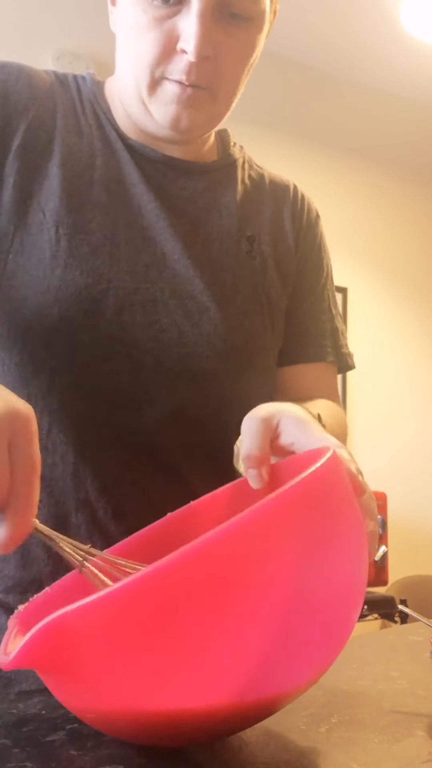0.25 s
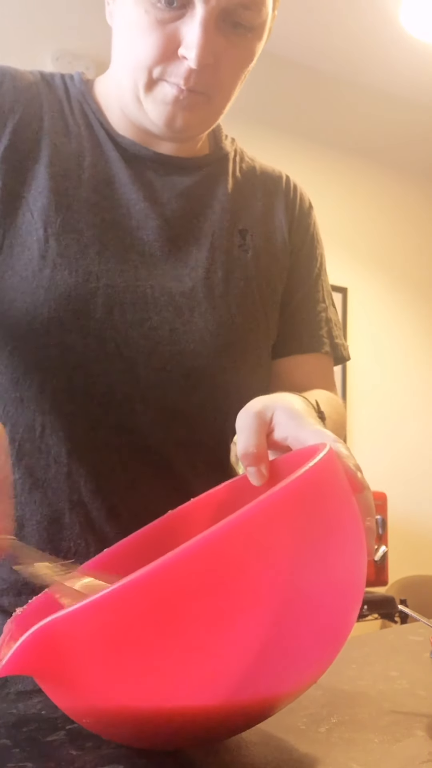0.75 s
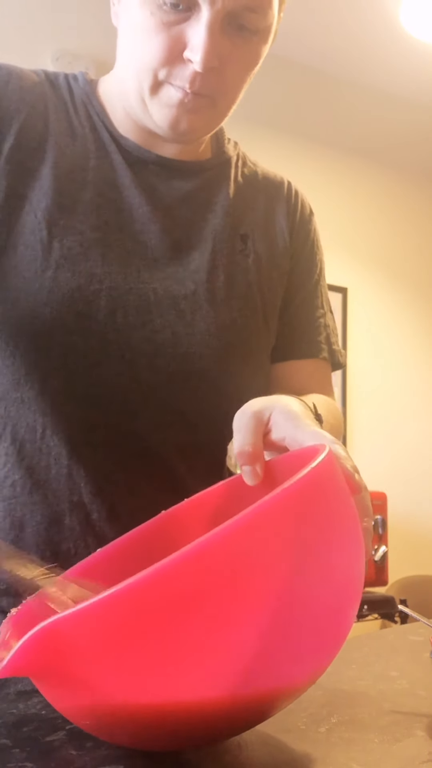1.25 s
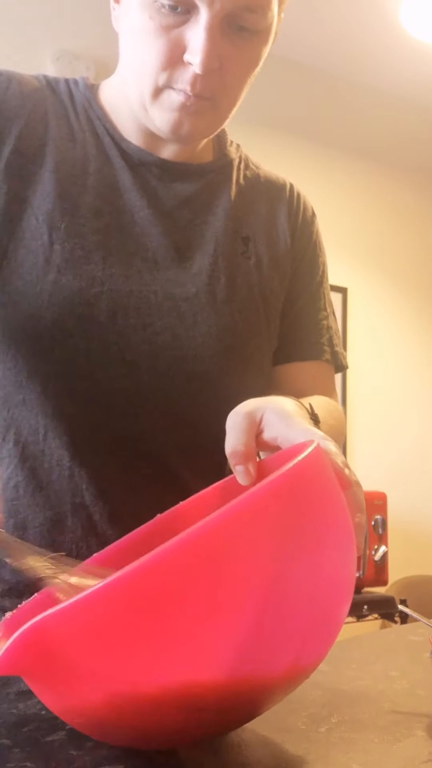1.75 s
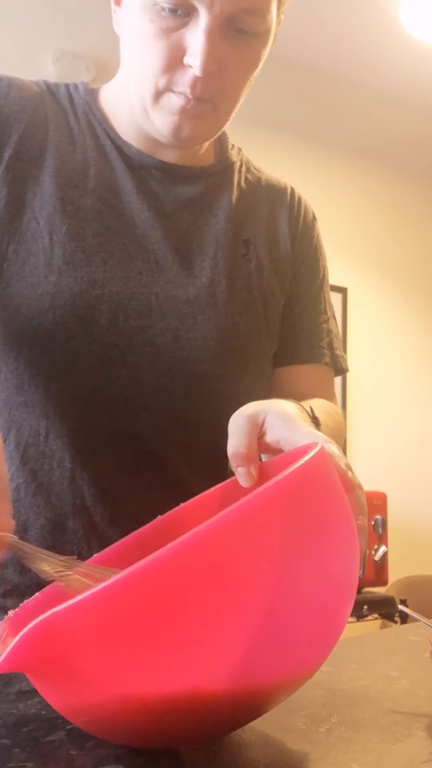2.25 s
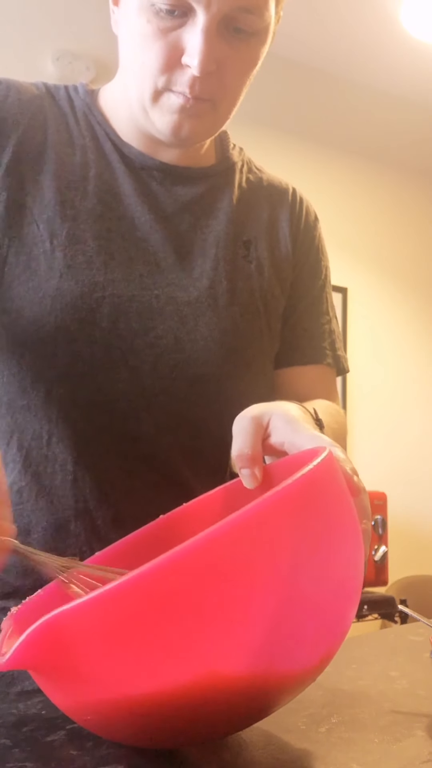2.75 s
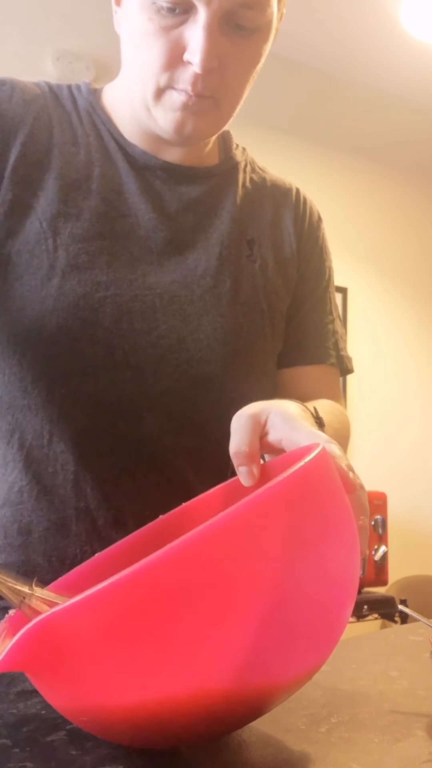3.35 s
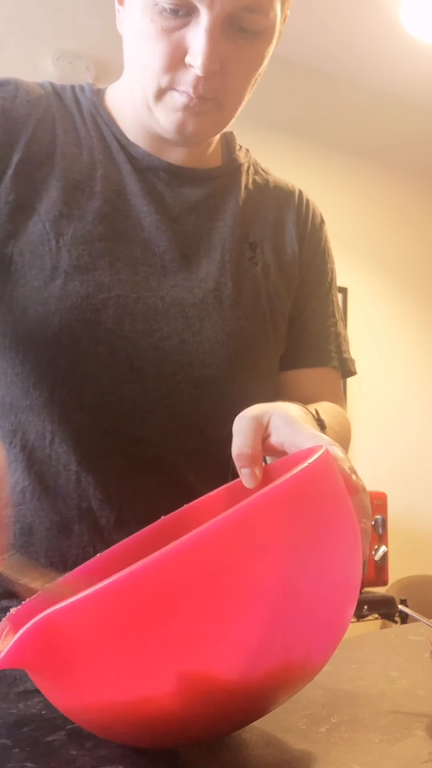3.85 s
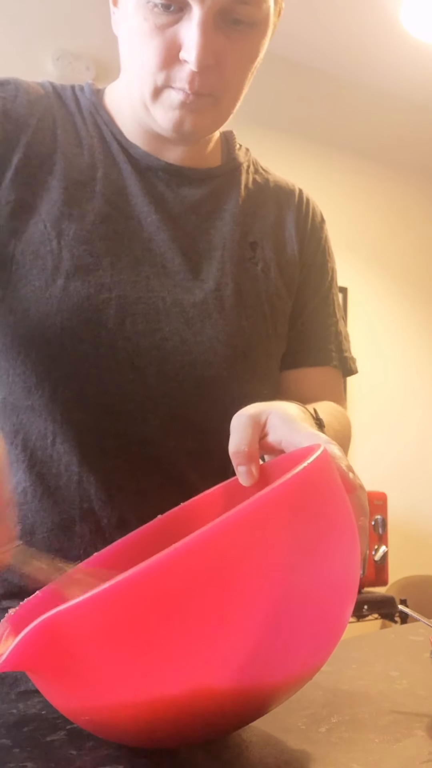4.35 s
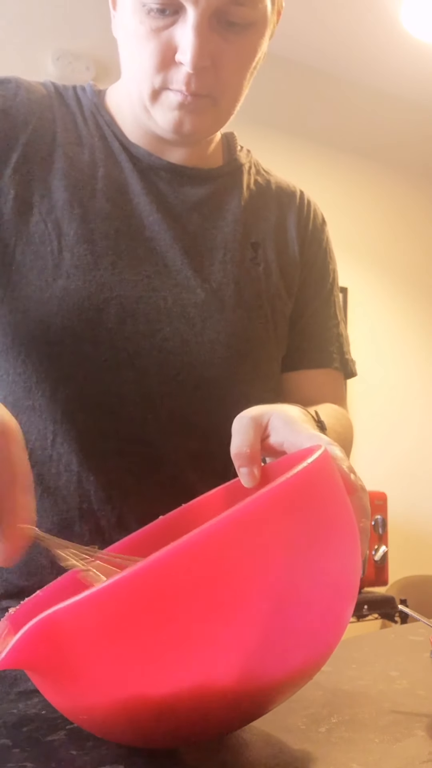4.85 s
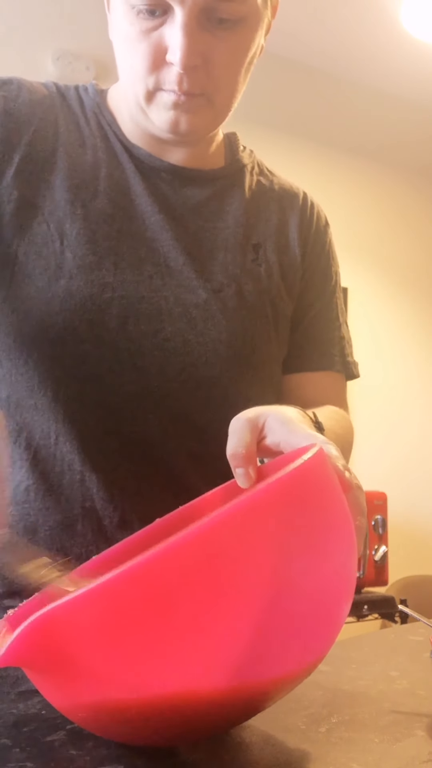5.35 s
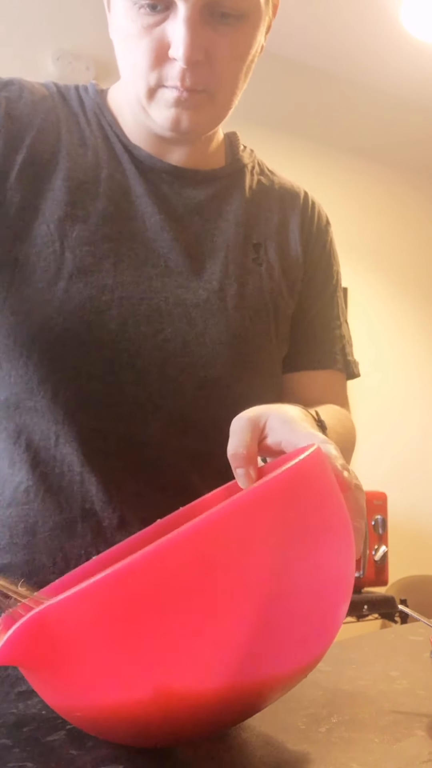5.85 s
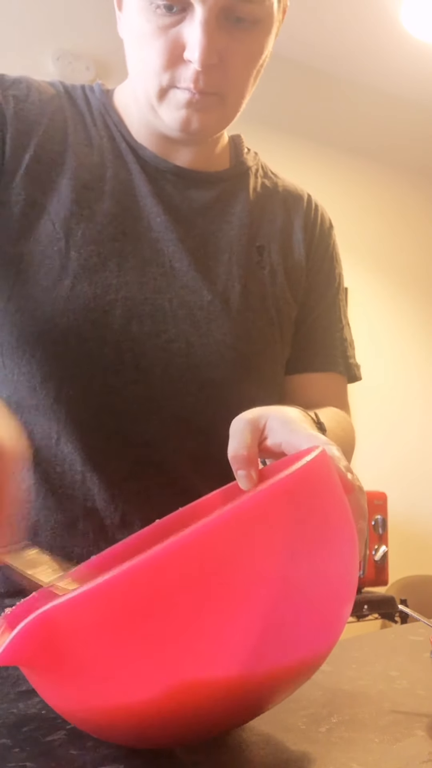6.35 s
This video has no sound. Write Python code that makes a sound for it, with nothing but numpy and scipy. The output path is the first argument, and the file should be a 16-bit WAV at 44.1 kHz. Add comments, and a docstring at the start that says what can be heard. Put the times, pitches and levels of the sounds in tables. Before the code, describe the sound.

Rapid whisking in a plastic bowl: raspy wire scrapes, wet slaps, plasticky clacks and low batter thumps, heard very close with short kitchen echoes.

```python
"""A wire whisk beats batter in a plastic bowl, about six strokes a second, close to a phone.
In each stroke the wires slap into the batter, drag through it, scrape up the wall and lift off: shaped random clicks.
Knocks on the wall are short noise bursts through ringing plastic; lumps of batter flop with a low thump.
The deeper the whisk runs, the longer it drags and the more the batter wobbles and fizzes between strokes.
The bowl booms low and rings near 2 kHz; quick echoes, a small room and a faint background surround it."""
import sys
import numpy as np
from scipy import signal
from scipy.fft import rfft, irfft
from scipy.io import wavfile
from scipy.ndimage import uniform_filter1d

SR = 44100
rng = np.random.default_rng(int(sys.argv[2]) if len(sys.argv) > 2 else 0)


def output_pcm(signal):
    """Save a mono or channel-first signal as 16-bit PCM at the path in sys.argv[1].

    Samples are clipped to [-1, 1] before scaling.
    """
    pcm = np.clip(np.atleast_2d(signal).T, -1, 1) * 32767
    wavfile.write(sys.argv[1], SR, np.round(pcm).astype(np.int16))


N = 290619
T = np.arange(N) / SR  # time in seconds

# All levels in dB are relative: later mixing gains also apply.
# turns of the whisk: (lands_s, fastest_scrape_s, scrape_db, push_on_bowl_db)
STROKES = [(0.042, 0.063, -33, -7.5), (0.28, 0.297, -23, -10), (0.46, 0.48, -19, -4.5),
           (0.634, 0.666, -21, -5), (0.749, .851, -19.5, -11.5), (0.919, 1.02, -17, -4.5),
           (1.092, 1.185, -16.5, -0.5), (1.274, 1.352, -19, -1), (1.413, 1.522, -13.5, -2.5),
           (1.588, 1.682, -18, -1.5), (1.786, 1.844, -18, -5.5), (1.937, 2.005, -19, -2),
           (2.106, 2.168, -24, -7), (2.289, 2.343, -17, 3.5), (2.432, 2.509, -17.5, 1),
           (2.618, 2.663, -21, 5.5), (2.808, 2.832, -21, 8.5), (2.944, 3.03, -23.5, -13),
           (3.11, 3.191, -21, -5), (3.273, 3.355, -26.5, -1), (3.449, 3.53, -23, -2),
           (3.62, 3.698, -22.5, -1.5), (3.806, 3.881, -16.5, -4), (3.963, 4.04, -21, -5),
           (4.149, 4.215, -17, -0.5), (4.287, 4.393, -15, -6.5), (4.488, 4.569, -18, -20),
           (4.649, 4.74, -21.5, -3), (4.819, 4.905, -25, -1.5), (5.012, 5.095, -19.5, -3.5),
           (5.173, 5.283, -28, -3), (5.347, 5.459, -19, -1), (5.526, 5.644, -20, -9.5),
           (5.702, 5.826, -18, 2.5), (5.895, 6.005, -16, 0), (6.08, 6.191, -22, -3.5),
           (6.262, 6.37, -17.5, -2), (6.433, 6.56, -22.5, 1)]
# big lumps of batter flopping against the bowl: (start_s, level_db, pitch_hz)
FLOPS = [(0.134, -8, 120), (0.187, -17, 140), (0.239, -17.5, 114), (0.362, -11.5, 128), (0.543, -16, 156),
         (1.412, -13, 160), (4.477, -16, 154), (4.748, -12.5, 170), (4.819, -15.5, 148), (5.56, -19, 150),
         (5.898, -20.5, 130), (6.449, -20, 152)]
# ringing of the hollow above the batter: (pitch_hz, width_hz, level_db)
HOLLOW_MODES = [(471, 55, -5.5), (527, 39, -4), (628, 37.5, 1.5), (706.4, 47, -2.5), (765, 43, -6.5),
                (915, 63, -16.5)]
# ringing of the plastic wall: (pitch_hz, width_hz, level_db)
WALL_MODES = [(1214, 42, -6), (1286, 43, -5.5), (1588, 28, -7), (1774, 53, -3), (1923, 91, 1.5),
              (2109, 120, -1.5), (2303, 154, -1.5), (2506, 108, 2.5), (2833, 166, -2)]
# tone of wires sliding fast on the wall: (frequency_hz, level_db)
SCRAPE_TONE = [(500, -33.5), (1500, -11), (2500, -3.5), (3300, -10.5), (4200, -4.5), (5300, 1.5), (5750, 3),
               (6250, -9.5), (7500, 5.5), (8400, -4), (10200, -6), (12500, -31.5), (15500, -45)]

WETTER_DB_PER_S = 0.6  # the batter smacks louder as it is beaten wetter


def undb(db):
    """Turn decibels into a gain."""
    return 10 ** (np.asarray(db) / 20)


def unit(x):
    """Scale to an rms (average strength) of one."""
    return x / np.sqrt(np.mean(x ** 2))


def peaked(x):
    """Scale so that the loudest 4 ms have an rms of one."""
    loudest_power = uniform_filter1d(x ** 2, SR // 250).max()
    return x / np.sqrt(loudest_power)


def add(track, s, sound):
    """Mix a short sound into a track at time s."""
    i = max(int(s * SR), 0)
    track[i:i + len(sound)] += sound[:max(N - i, 0)]


def through(x, response):
    """Pass a sound through an impulse response."""
    return signal.fftconvolve(x, response)[:len(x)]


def excite(force, response):
    """Drive a resonator or tone filter whose response is scaled to unit energy."""
    return through(force, response / np.linalg.norm(response))


def gains(points, size):
    """Read a (frequency_hz, level_db) curve at every frequency of a transform."""
    hz, db = np.transpose(points)
    bins_hz = np.fft.rfftfreq(size, 1 / SR)
    return undb(np.interp(np.log(bins_hz + 1), np.log(hz), db))


def colour(points, size=1024):
    """Make an impulse response with the given tone that never sounds ahead of its cause."""
    # folding the cepstrum forward in time gives the minimum-phase response
    cepstrum = irfft(np.log(gains(points, size)))
    cepstrum[1:size // 2] *= 2
    cepstrum[size // 2 + 1:] = 0
    return irfft(np.exp(rfft(cepstrum)))


def ring(modes, size=8192):
    """Add up dying sine tones; wider modes die faster and neighbours swing in opposite directions."""
    t = T[:size]
    total = np.zeros(size)
    for k, (hz, width, db) in enumerate(modes):
        dying = np.exp(-np.pi * width * t)
        total += (-1) ** k * undb(db) * width * dying * np.sin(2 * np.pi * hz * t)
    return total


def drift(per_s, count=1000):
    """Join random values by straight lines, per_s of them each second."""
    return np.interp(T * per_s, np.arange(count), rng.standard_normal(count))


def slips(per_s, spread_db):
    """Stick-slip makes random tiny clicks of uneven size, rms one."""
    happens = rng.random(N) < per_s / SR
    direction = np.sign(rng.standard_normal(N))
    size = undb(spread_db * rng.standard_normal(N))
    return unit(happens * direction * size)


def burst(swell_s, size=8192):
    """A rough contact is noise that swells and dies within milliseconds."""
    t = T[:size]
    return rng.standard_normal(size) * t / swell_s * np.exp(-t / swell_s)


def thump(hz, swell_s, size=6000):
    """A soft push is a low sine whose strength swells to one and dies away."""
    t = T[:size]
    strength = (t / swell_s) ** 2 * np.exp(2 - 2 * t / swell_s)
    return strength * np.sin(2 * np.pi * hz * t)


def background():
    """Both microphones share a low room rumble; higher up each has its own faint hiss."""
    # tone of the background: (frequency_hz, level_db)
    hum_tone = [(20, -11), (45, -3), (65, -27), (200, -11), (400, -27), (2000, -21.5), (8000, -18),
                (15500, -36)]
    shared = rfft(rng.standard_normal(N))
    own = rfft(rng.standard_normal((2, N)))
    apart = np.clip(np.fft.rfftfreq(N, 1 / SR) / 600, 0, 1)  # fully separate from 600 Hz up
    mixed = shared * np.sqrt(1 - apart ** 2) + own * apart
    return unit(irfft(mixed * gains(hum_tone, N), N))


def knocks(chatter_s, tick_s):
    """The loops land almost together: a burst rings the wall, with a steel tick and a push on the whole bowl."""
    # wires striking the wall: (start_s, clack_db, tick_relative_db, boom_relative_db)
    knock_times = [(0.025, -23, 11, -3), (0.2681, -21, 7, 0), (0.3491, -16, 7, -7), (0.4557, -25, 2, 5),
                   (0.636, -15.5, -1, -7), (0.8059, -13.5, -3, -4), (0.9243, -14.5, -3, -11.5),
                   (1.0945, -16, 4, -4), (1.475, -13, 10, -9), (1.6412, -11, 0, -4), (1.7973, -19, 16, 1.5),
                   (2.128, -9.5, -3, -10), (2.2949, -8, 2, -8.5), (2.622, -7.5, 5, -13),
                   (2.7869, -11.5, 11.5, -1.5), (2.9674, -9.5, 3.5, -8.5), (3.4743, -10.5, 0, -10),
                   (3.8235, -8.5, 4, -14), (4.1594, -10.5, 4, -8.5), (4.3547, -18.5, 11.5, -14),
                   (4.555, -15, 0, -6.5), (5.026, -12, 5.5, -10.5), (5.1695, -20.5, -2, -5),
                   (5.4064, -11, 3, -2)]
    bright, body = np.zeros((2, N))
    wall, hollow, tick = ring(WALL_MODES), ring(HOLLOW_MODES), colour(SCRAPE_TONE)
    for s, db, tick_db, boom_db in knock_times:
        force = burst(chatter_s)
        clack = undb(-7.5) * peaked(through(force, wall))
        clack += undb(-15.5) * peaked(through(force, hollow))
        steel = undb(-9.5) * peaked(through(burst(tick_s), tick))
        add(bright, s, undb(db) * (clack + undb(tick_db) * steel))
        add(body, s, undb(db + boom_db) * thump(hz=145.3, swell_s=0.0054))
    return bright, body


def depth(s):
    """Depth of the whisk in the batter at time s, from skimming (0) to fully deep (1)."""
    # how deep the whisk runs: (time_s, depth_0_to_1)
    depth_path = [(0, 1), (.45, .95), (.75, 0.46), (1.5, 0.4), (2.2, 0.37), (2.75, 0.01), (3.1, 0.57),
                  (4.1, 0.37), (4.5, 0.57), (6.5, 0.73)]
    return np.interp(s, *np.transpose(depth_path))


def wires(per_s, spread_db, grip_s, steady, count=1500):
    """The loops meet the wall one after another; each grips hard and lets go."""
    chance = rng.standard_normal((count, 2))
    gaps_s = np.exp(.35 * chance[:, 0]) / per_s
    at = (np.cumsum(gaps_s) * SR).astype(int)
    inside = at < N
    touches = np.zeros(N)
    touches[at[inside]] = undb(spread_db * np.clip(chance[inside, 1], -2, 2))
    grips = through(touches, np.exp(-T[:SR // 10] / grip_s))
    return unit(steady + unit(grips))


def motion(land_s, lift_s, release_s, boom_fade_s):
    """Each turn of the whisk sets the strength of drag, scrape, squelch and boom over time."""
    # levels of a stroke with a push of 0 dB, and the share of the push that the drag follows
    drag_db, squelch_db, boom_db, drag_follows = -24.5, -37, -27, 0.26
    # the wires lift off this long after the fastest scrape, when skimming and when fully deep
    skim_lift_s, deep_lift_s = -0.027, 0.077
    # basic scrape length at its usual level; a louder one is faster and so shorter
    scrape_length_s, usual_scrape_db, shorten_db_per_db = 0.02, -19, .5
    # after a stroke the batter wobbles on: level and settling time when fully deep
    wobble_db, settle_s = -33.5, 0.079
    # the drag starts this much softer and works up to full effort
    warm_up_db, warm_up_s = -2.5, 2.1
    drag, scrape, squelch, boom = np.zeros((4, N))
    for lands, fastest, scrape_db, push_db in STROKES:
        deep = np.clip(depth(lands), .01, 1)
        lifts = fastest + skim_lift_s + (deep_lift_s - skim_lift_s) * deep
        near = slice(max(int((lands - .1) * SR), 0), int((lifts + .25) * SR))
        t = T[near]
        since_landing = (t - lands) / land_s
        contact = np.clip(since_landing + 0.49, 0, 1) * np.clip((lifts - t) / lift_s + .5, 0, 1)
        # the batter slides off the wires before they leave the wall
        release = np.clip((lifts - t) / release_s + 0.21, 0, 1)
        loaded = np.clip(since_landing + 1.02, 0, 1) * release
        drag[near] += undb(drag_db + drag_follows * push_db) * contact
        # the scrape gathers speed slowly and breaks off sooner; it needs the wires on the wall
        length = scrape_length_s * undb(shorten_db_per_db * (usual_scrape_db - scrape_db))
        length = length * np.where(t < fastest, 1.1, .8)
        landed = np.clip(since_landing + 1, 0, 1)
        scrape[near] += undb(scrape_db) * landed * np.exp(-.5 * ((t - fastest) / length) ** 2)
        squelch[near] += undb(squelch_db + WETTER_DB_PER_S * lands) * loaded
        boom[near] += undb(boom_db + push_db) * loaded * np.exp(-(t - lands) / boom_fade_s)
        settling = (t > lifts) * np.exp(-np.abs(t - lifts) / (settle_s * deep))
        boom[near] += undb(wobble_db) * deep * settling
    effort = undb(warm_up_db * np.clip(1 - T / warm_up_s, 0, 1))
    return effort * drag, scrape, squelch, boom


def whisking():
    """Stick-slip clicks from the passing wires sound directly and ring the bowl; returns bright part and boom."""
    # tone of wires ploughing through batter: (frequency_hz, level_db)
    plough_tone = [(250, -35), (900, -6.5), (1500, -5), (2200, -5), (2900, -6), (3500, -4.5), (4400, -3),
                   (5300, 0), (6300, -3), (7500, -1.5), (8500, -6.5), (10200, -11.5), (12500, -36.5),
                   (15500, -43)]
    # tone of foam fizzing on the wires: (frequency_hz, level_db)
    foam_tone = [(300, -31), (1000, -13.5), (1700, 1), (2600, -9), (3600, -5), (5500, -2), (7500, 2),
                 (10200, -6.5), (12500, -30), (15500, -48)]
    # steel loops, damped by batter: (pitch_hz, width_hz, level_db)
    wire_modes = [(2500, 690, -7), (4800, 530, -2), (5610, 280, 5), (5850, 670, -0.5), (7120, 200, 0.5)]
    # the whole loaded bowl flexing: (pitch_hz, width_hz, level_db)
    boom_modes = [(98, 25, -2.5), (119, 33, -2.5), (155.6, 18.9, 2.5), (195, 34, -3)]
    # foam: level when fully deep, and its rise from skimming to fully deep
    fizz_db, fizz_rise_db = -36, 3
    drag, scrape, squelch, boom = motion(land_s=0.013, lift_s=0.018, release_s=0.021, boom_fade_s=0.21)
    grip = wires(per_s=125, spread_db=3.0, grip_s=0.0048, steady=0.61)
    plough = excite(drag * grip * slips(per_s=4000, spread_db=1.5), colour(plough_tone))
    slide = excite(scrape * grip * slips(per_s=12000, spread_db=3), colour(SCRAPE_TONE))
    # single loops snag and spring free
    snags = excite((drag + scrape) * slips(per_s=350, spread_db=1.0), colour(SCRAPE_TONE))
    # each sliding loop sings very briefly at a pitch of its own
    zing = np.zeros(N)
    for mode in wire_modes:
        rubbing = scrape * undb(3.9 * drift(per_s=97)) * slips(per_s=6000, spread_db=2.5)
        zing += undb(mode[2]) * excite(rubbing, ring([mode], size=512))
    # how well the wall takes up the rubbing depends on where it is touched
    uptake = undb(2.3 * drift(per_s=45))
    wall_force = (undb(-6.0) * drag + undb(-16.5) * scrape) * grip * uptake
    wall = excite(wall_force * slips(per_s=2100, spread_db=4), ring(WALL_MODES))
    wet = excite(squelch * grip * slips(per_s=900, spread_db=1.5), ring(HOLLOW_MODES))
    # fizz and a faint rumble of the batter fade in until the second stroke, then go on
    stirred = np.clip(T / STROKES[1][0], 0, 1)
    foam = stirred * undb(fizz_db + fizz_rise_db * (depth(T) - 1.0))
    fizz = excite(foam * slips(per_s=7300, spread_db=4.5), colour(foam_tone))
    push = (boom + undb(-45) * stirred) * grip
    body = excite(push * slips(per_s=1500, spread_db=0.5), ring(boom_modes))
    bright = undb(-1.5) * plough + undb(-6.0) * slide + undb(-9.5) * snags + undb(-15.0) * zing
    return bright + wall + wet + fizz, body


def flops(swell_s):
    """Each lump of batter pushes the bowl for a few slow cycles."""
    out = np.zeros(N)
    for s, db, hz in FLOPS:
        add(out, s, undb(db) * thump(hz, swell_s))
    return out


def slaps(swell_s, scatter_db):
    """A soft wet smack rings the hollow as a lump lands, or the whisk from its second stroke on."""
    slap_db, flop_smack_db = -30.5, -12.5  # the second is relative to the lump's level
    out, hollow = np.zeros(N), ring(HOLLOW_MODES)
    landings = []
    for s, *_ in STROKES[1:]:
        landings.append((s, slap_db + WETTER_DB_PER_S * s + scatter_db * rng.standard_normal()))
    lumps = [(s, db + flop_smack_db) for s, db, _ in FLOPS]
    for s, db in landings + lumps:
        add(out, s, undb(db) * peaked(through(burst(swell_s), hollow)))
    return out


def reflections(x, near_db, near_s, room_db, t60_s, count=6, size=20000):
    """Fading noise gives quick echoes from bowl and counter and the room's tail, for both microphones."""
    t = T[:size]
    # tones of the echoes: (frequency_hz, level_db)
    near_colour = colour([(150, -15), (700, -4), (2000, -2.0), (15000, -1.5)])
    room_colour = colour([(150, -6.5), (600, -1.5), (1000, -2.5), (2500, 4), (8000, -9), (15000, -5.5)])
    # the whisk roams over the wall, and every spot has its own paths
    spots = np.array([drift(per_s=30) for _ in range(count)])
    spots /= np.linalg.norm(spots, axis=0)
    out = np.zeros((2, N))
    for spot in spots:
        for ear in out:
            near_noise = rng.standard_normal(size) * np.exp(-t / near_s) * (t > .0008)
            near = through(near_noise, near_colour)
            tail_noise = rng.standard_normal(size) * undb(-60 * t / t60_s) * (t > .007)
            tail = through(tail_noise, room_colour)
            paths = undb(near_db) * near / np.linalg.norm(near)
            paths += undb(room_db) * tail / np.linalg.norm(tail)
            ear += through(x * spot, paths)
    return out


def scene():
    """The bowl stands nearer to the right microphone, so the left one hears it later."""
    rub, rub_boom = whisking()
    hit, hit_boom = knocks(chatter_s=0.00062, tick_s=0.00083)
    bright = undb(-2.5) * (rub + hit) + undb(-5.5) * slaps(swell_s=0.0025, scatter_db=1.0)
    boom = rub_boom + hit_boom + undb(-2.5) * flops(swell_s=0.009)
    # a small bowl radiates little deep bass: cut below 78 Hz
    boom = signal.sosfiltfilt(signal.butter(3, 78, "high", fs=SR, output="sos"), boom)
    echoes = reflections(bright, near_db=2.5, near_s=0.0048, room_db=-6.0, t60_s=0.33)
    left, right = bright + boom + echoes
    # the lag wanders a little as the whisk moves about
    lag_s = .00058 + .000015 * drift(per_s=12)
    left = np.interp(T - lag_s, T, left, left=0)
    return np.array([left, right]) + undb(-41.5) * background()


def record(dry):
    """Each microphone has its own colour (left dull on top); the phone rounds peaks and cuts the top treble."""
    # response of the two microphones: (frequency_hz, left_db, right_db)
    mic_tones = [(200, 0, 0), (450, -2, 1), (1500, -2, 1), (2000, -.7, .7), (3800, -1, .5), (4700, 2, -3),
                 (5700, -1, 0), (6500, -1, 1), (7000, 1.5, -2), (7650, -3, 2), (8500, -12, 2),
                 (10100, -18, 2), (11500, -7, 2), (13200, -1, 1)]
    mics = np.array(mic_tones)
    heard = np.array([through(x, colour(mics[:, [0, k + 1]])) for k, x in enumerate(dry)])
    ceiling, top_hz = .88, 15500
    rounded = heard / (1 + (heard / ceiling) ** 6) ** (1 / 6)
    return signal.sosfilt(signal.ellip(10, .2, 80, top_hz, fs=SR, output="sos"), rounded)


dry = scene()
out = record(dry)
output_pcm(out)
```